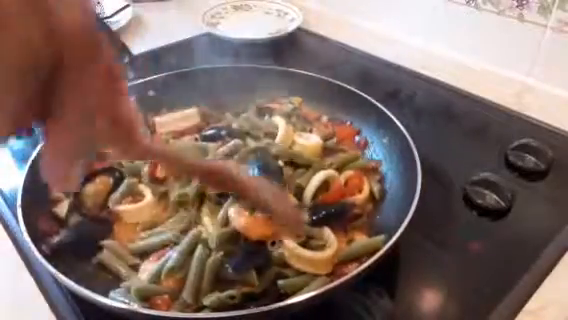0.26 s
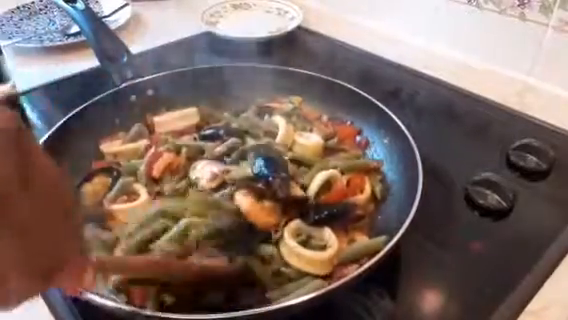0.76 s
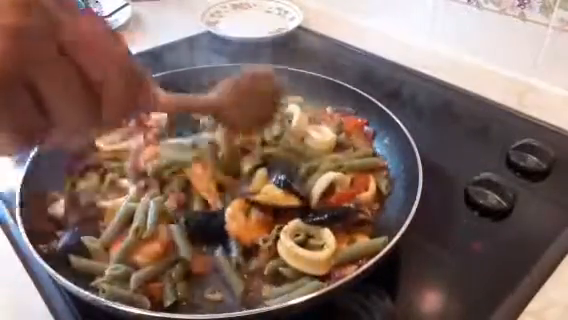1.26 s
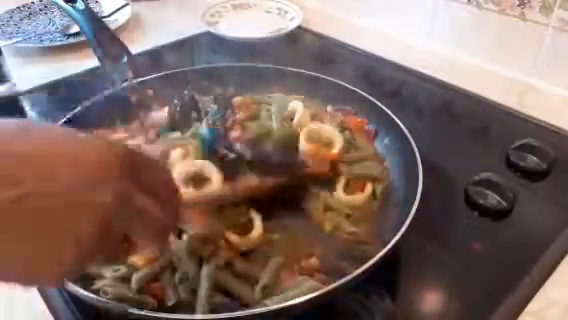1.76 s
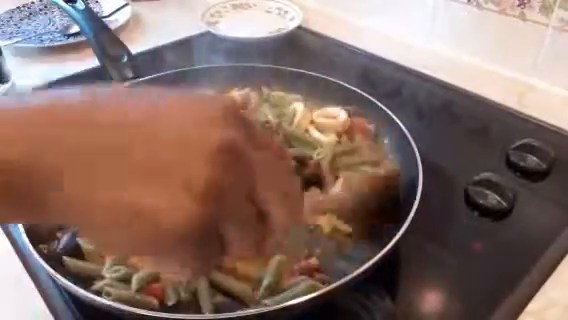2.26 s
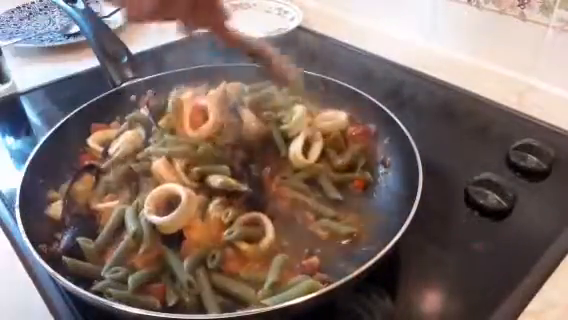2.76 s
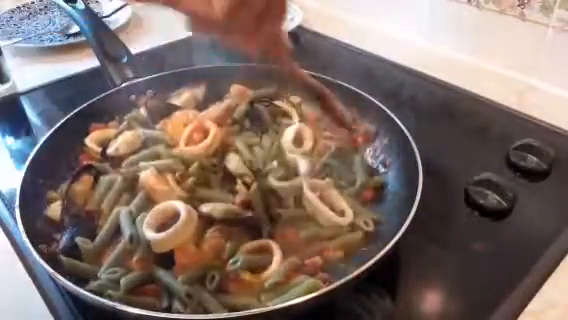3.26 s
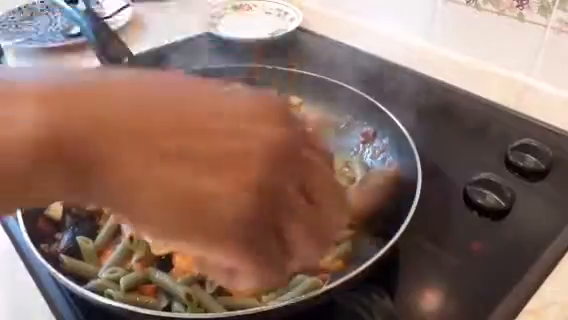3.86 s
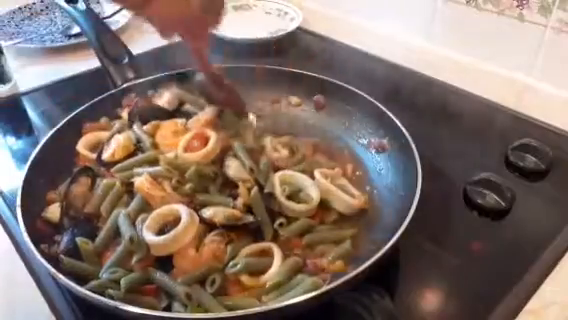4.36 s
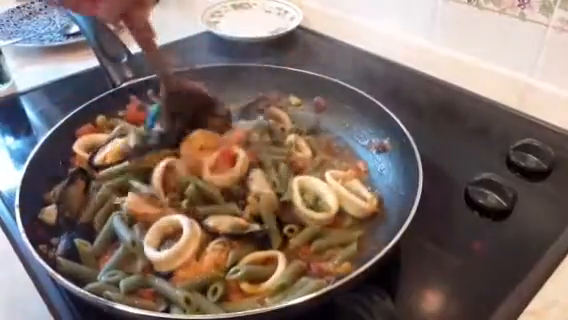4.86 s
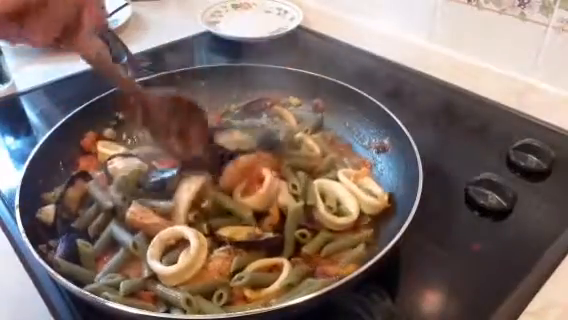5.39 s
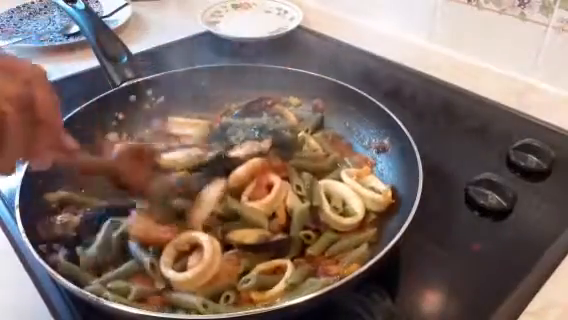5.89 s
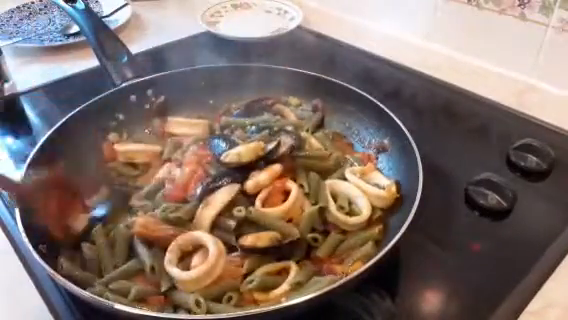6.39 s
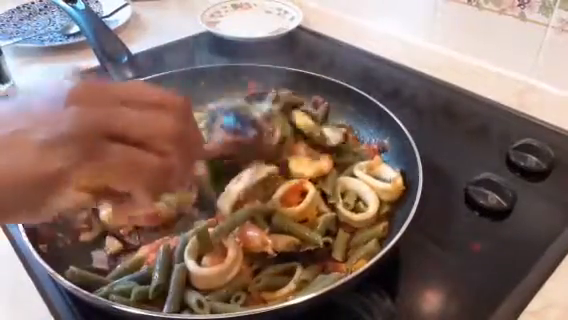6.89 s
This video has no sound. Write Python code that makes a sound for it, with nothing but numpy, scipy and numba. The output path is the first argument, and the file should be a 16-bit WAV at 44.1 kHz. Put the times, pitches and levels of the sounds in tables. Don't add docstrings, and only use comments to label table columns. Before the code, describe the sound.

A wooden spatula knocks and scrapes in a full frying pan, some taps cracking on shells, over soft sizzle and a low fan hum.

```python
import sys
import numpy as np
from scipy import signal
from scipy.fft import rfft, irfft
from scipy.io import wavfile
from scipy.ndimage import uniform_filter1d
from numba import njit

SR = 44100
rng = np.random.default_rng(int(sys.argv[2]) if len(sys.argv) > 2 else 0)


def log_audio(samples):
    frames = np.atleast_2d(samples).T
    limited = np.clip(frames, -1, 1)
    pcm = np.round(limited * 32767).astype(np.int16)
    wavfile.write(sys.argv[1], SR, pcm)


def boost_factor(decibels):
    exponent = np.asarray(decibels, float) / 20
    return 10 ** exponent


N = 314874
TIME = np.arange(N) / SR

# start_s, wall_db, hob_rel_db, base_rel_db, wall_pitch_hz
MIDDLE_BLOWS = [
    (2.29, -20, -5, -7, 734),
    (2.575, -46.5, 4, -28, 649),
    (3.403, -29.5, -2, -3.5, 574),
    (3.828, -20.5, -7.5, -2, 513),
    (6.419, -32, -7.5, -2, 730),
    (6.989, -54, -3, -27, 1230),
]
# start_s, wall_db, hob_rel_db, base_rel_db, wall_pitch_hz
EDGE_BLOWS = [(0.48, -32, 1, 6, 720), (0.529, -34, -16, 5, 800), (0.545, -27.5, -2, -21, 820),
              (0.662, -43, 1.5, 10, 646), (1.521, -25, -9.5, -1, 685), (4.662, -17.5, -13, -5.5, 690),
              (4.808, -37.5, -20.5, -4, 577), (5.143, -17, -15, -3, 1140), (5.7, -21.5, -10.5, -3, 711),
              (5.811, -25, -25, -7.5, 1160), (6.356, -19, -17.5, -14.5, 855), (6.399, -30, -15, 3, 1080),
              (6.759, -31.5, -10, -3, 960)]
# start_s, wall_db, base_rel_db, wall_pitch_hz
BUMPS = [
    (0.61, -35, 1.5, 528),
    (0.73, -34, -5.5, 540),
    (0.789, -31.5, -38, 1080),
    (1.655, -24.5, -31, 950),
    (1.804, -45, -30, 1210),
    (2.616, -36, -10.5, 493),
    (4.602, -23, -27, 1400),
    (5.249, -38.5, 5, 1160),
    (5.312, -28.5, -38, 1460),
    (6.81, -41.5, -4, 1010),
]
MIDDLE_HZ, EDGE_HZ, BUMP_HOB_DB = 132, 188.4, -61
# pitch_hz, level_db, fade60_s
HOB_MODES = [(119.2, 0.5, 0.5), (166.7, 2.5, 0.19), (201, -3.5, 0.33)]
# pitch_hz, level_db, fade60_s
BASE_MODES = [(246, -24.5, 0.54), (312.5, -3, 0.3), (359.3, -2.5, 0.52), (413.3, -15, 0.31)]
# pitch_hz, level_db, fade60_s
WALL_MODES = [(489, 11, 0.045), (613, -10.5, 0.33), (646, -4, 0.2), (711, 6.5, 0.088), (767, -7, 0.3),
              (875, 0, 0.14), (918, 10.5, 0.027), (1080, 5, 0.081), (1153, 0, 0.17), (1405, 16, 0.015)]

# start_s, level_db, pitch_hz, snap_rel_db
TICKS = [(0.722, -30, 2677, -12), (1.0195, -23, 1900, -2), (1.132, -38, 2350, -15), (1.5206, -24, 2410, -4),
         (1.8114, -27, 1450, -18), (2.0703, -29, 2050, -8), (2.6195, -26, 1300, -4),
         (3.4035, -21, 1180, -25), (3.8269, -17.5, 2330, -12), (5.3098, -26, 2100, -10),
         (5.8117, -17, 2280, -20), (6.0656, -30, 2300, -18), (6.3556, -20, 2700, 3),
         (6.4188, -26, 2350, -15), (6.9905, -33, 1460, -16), (7.0837, -31, 2200, -16)]
# start_s, level_db, pitch_hz, crack_rel_db, crack_top_rel_db
CRACKS = [(0.5495, -32, 2580, 1, -19), (1.707, -31, 1940, 1.5, -6), (1.7517, -32, 2360, -26, -6),
          (1.8444, -44.5, 1970, 13, -14), (2.0013, -51, 2600, -32, 14), (2.29, -18, 2394, -14, -12),
          (4.299, -37.5, 2450, -4, -23), (4.6041, -19, 2550, 12.5, -27), (4.9092, -35.5, 1940, -4.5, -21),
          (5.1426, -14.5, 2540, -9, -22), (5.351, -28, 1640, -31, -2), (5.699, -13, 2240, -11, -45),
          (6.7614, -17.5, 1530, -5, -1), (6.948, -37, 2570, 8, 11), (7.1304, -36, 4050, -2, 21.5)]
TAP_CRACK_DB, TAP_TOP_DB = -26, -38
SNAP_DB, SNAP_S, SNAP_HZ = -2, .0008, 5800
# share_of_tap_pitch, level_db, fade60_s
WOOD_MODES = [(.78, -9, .022), (.92, -3, .035), (1, 0, .042), (1.09, -4, .035), (1.28, -9, .022),
              (1.5, -13, .015)]
# pitch_hz, level_db, fade60_s
SHELL_MODES = [(5200, -4, .015), (5900, -3, .025), (6600, 0, .035), (7300, -3, .03), (8100, -5, .02)]
# pitch_hz, level_db, fade60_s
CHIP_MODES = [(9500, 0, .006), (12500, -2, .005)]

# start_s, level_db, upper_modes_rel_db
PINGS = [
    (0.5324, -33.5, -18),
    (0.5999, -39, -1),
    (1.5197, -32, -31),
    (4.61, -24, 0),
    (4.6793, -26.5, -30),
    (5.1443, -24, -38),
    (5.7027, -24, -31),
    (6.3684, -29, -26),
]
# pitch_hz, level_db, fade60_s
RIM_MODES = [(2483, 0, .095), (3365, -11, .08), (4177, -2, .12)]

# start_s, length_s, rumble_db, rasp_db, hollow_under_blade_hz
STROKES = [(0.0, 0.21, -73, -73, 970), (0.48, 0.32, -47, -47.5, 690), (0.76, 0.09, -41.5, -41.5, 990),
           (0.828, 0.17, -46, -50.5, 785), (1.017, 0.18, -54, -57.5, 850), (1.591, 0.22, -40.5, -40, 900),
           (1.789, 0.096, -49.5, -46.5, 1130), (2.046, 0.093, -54, -62, 910),
           (2.286, 0.26, -42.5, -45.5, 720), (2.447, 0.24, -52, -48.5, 795), (2.622, 0.2, -59, -55, 850),
           (2.98, 0.24, -48, -48.5, 926), (3.418, 0.22, -56, -52, 684), (3.942, 0.24, -42.5, -48.5, 760),
           (4.107, 0.1, -36.5, -44, 1050), (4.23, 0.27, -50.5, -49, 750), (4.658, 0.32, -52.5, -48.5, 705),
           (5.273, 0.17, -49.5, -47, 930), (5.787, 0.11, -40.5, -45, 910), (5.862, 0.14, -54, -53.5, 880),
           (6.337, 0.21, -45, -46.5, 796), (6.51, 0.31, -46.5, -48, 710), (6.85, .15, -50, -56, 1200),
           (7.065, .14, -59, -52, 1100)]
# start_s, rumble_db, rasp_db
SKIDS = [
    (.49, -47, -50),
    (1.532, -32.5, -56),
    (3.411, -43, -66),
    (3.84, -64, -47.5),
    (4.609, -39.5, -27),
    (5.15, -60, -37.5),
    (5.711, -54, -46),
    (6.768, -63, -32),
]
SKID_FADE60_S, SWELL, HOLLOW_GLIDE = 0.22, 0.89, 0.19
REST_DB, REST_HZ = -70, 770
SQUEAL_HZ, SQUEAL_SAG_HZ, PRESSED_DB = 2300, 350, -42
LIFT_DB_PER_OCTAVE = 7
# pitch_hz, level_db
RASP_TONE = [(1200, -18.5), (1600, 14.5), (2300, -1), (3200, 6), (4500, -1), (7000, -7.5)]

# start_s, level_db
FRYING = [(0.0, -54.5), (0.34, -58), (0.69, -52.5), (1.11, -57.5), (1.53, -59.5), (1.77, -54),
          (2.13, -59.5), (2.5, -54), (2.76, -57.5), (3.06, -54.5), (3.24, -59.5), (4.26, -58.5),
          (5.19, -59.5), (5.37, -54), (5.7, -57.5), (6.18, -58.5), (6.56, -54.5), (7.14, -55)]
# pitch_hz, level_db
SIZZLE_TONE = [(1470, -18), (2500, -42), (2830, -14), (3520, -4.5), (6970, -7), (8940, -5.5), (10800, -10),
               (14900, -10), (16000, -33)]
# pitch_hz, level_db
AIR_TONE = [(18, -42), (30, -20), (62, -32), (91, 3), (123, -1.5), (239, -19), (359, -1), (409, -11),
            (575, -2), (728, -6.5), (864, -5.5), (1220, -4.5), (1680, -6), (2120, -4), (5000, -12),
            (6500, -11.5), (11000, -120)]
FAN_HZ, FAN_DB, AIR_DB = 47.7, -61.5, -53
# pitch_hz, level_db
ROOM_TONE = [(60, -12), (300, -4), (1000, -2), (3000, -1), (8000, -1), (16000, -6)]

# pitch_hz, lag_radians
PORT_LAG = [(0, 0), (430, .2), (1030, 1.0), (1640, 2.9), (16000, 27.4), (22050, 37.7)]
# pitch_hz, share
PORT_ALIKE = [(30, 0.3), (130, 0.79), (300, 0.93), (800, 0.87), (3000, 0.059), (16000, 0.028)]
# pitch_hz, level_db
PORT_TILT = [(30, -4), (150, -2.5), (400, -3), (1500, -1.5), (5000, -1.5), (9000, -2.5), (13000, 2)]
TOP_HZ = 15850


def knocks():
    out = np.zeros(N)
    blows = [(*row, MIDDLE_HZ) for row in MIDDLE_BLOWS] + [(*row, EDGE_HZ) for row in EDGE_BLOWS]
    blows += [(s, db, BUMP_HOB_DB, base_db, hz, EDGE_HZ) for s, db, base_db, hz in BUMPS]
    for s, db, *place in blows:
        add(out, s, boost_factor(db) * pan_blow(*place))
    taps = [(*row, SNAP_DB) for row in CRACKS]
    taps += [(s, db, hz, TAP_CRACK_DB, TAP_TOP_DB, snap_db) for s, db, hz, snap_db in TICKS]
    for s, db, *contact in taps:
        add(out, s, boost_factor(db) * tap(*contact))
    for s, db, upper_db in PINGS:
        add(out, s, boost_factor(db) * rim_ping(upper_db))
    return out


def pan_blow(hob_db, base_db, wall_hz, hob_hz):
    hob = struck(favour(HOB_MODES, hob_hz, 16), rise_s=.008, detune=.01,
                 crack_db=-8, crack_s=.012, scatter_db=1)
    base = struck(BASE_MODES, rise_s=0.0076, detune=0.0033, crack_db=2, crack_s=0.016)
    wall = struck(favour(WALL_MODES, wall_hz, 12), rise_s=.0007, detune=.003,
                  crack_db=-6, crack_s=.006, scatter_db=1.5)
    return boost_factor(hob_db) * hob + boost_factor(base_db) * base + wall


def tap(hz, crack_db, top_db, snap_db):
    modes = [(share * hz, db, t60) for share, db, t60 in WOOD_MODES]
    wood = struck(modes, rise_s=.0003, detune=.01, crack_db=-5, crack_s=.0045, scatter_db=1)
    shell = struck(SHELL_MODES, rise_s=.0002, detune=.01, crack_db=7, crack_s=.004)
    chip = struck(CHIP_MODES, rise_s=.0002, detune=.05, crack_db=9, crack_s=.002)
    return wood + boost_factor(snap_db) * snap() + boost_factor(crack_db) * shell + boost_factor(top_db) * chip


def snap():
    t = TIME[:SR // 2]
    burst = rng.standard_normal(len(t)) * np.exp(-t / SNAP_S)
    burst = signal.sosfilt(signal.butter(3, [1500, SNAP_HZ], "band", fs=SR, output="sos"), burst)
    return burst / abs(burst).max()


def rim_ping(upper_db):
    rim = RIM_MODES[:2] + [(hz, db + upper_db, t60) for hz, db, t60 in RIM_MODES[2:]]
    return struck(rim, rise_s=.002, detune=.002, crack_db=-14, crack_s=.006, scatter_db=1)


def struck(modes, rise_s, detune, crack_db, crack_s, scatter_db=7.5):
    t = TIME[:SR // 2]
    hz, db, t60 = np.transpose(modes)[:, :, None]
    level_luck, pitch_luck, phase_luck = rng.standard_normal((3, len(modes), 1))
    fading = boost_factor(db + scatter_db * level_luck - 60 * t / t60)
    tones = fading * np.sin(2 * np.pi * hz * (1 + detune * pitch_luck) * t + 0.21 * phase_luck)
    tones = tones.sum(0) * (1 - np.exp(-t / rise_s))
    contact = np.exp(-t / crack_s) + .3 * np.exp(-t / (6 * crack_s))
    sos = signal.butter(3, [.8 * hz.min(), 1.25 * hz.max()], "band", fs=SR, output="sos")
    crack = signal.sosfilt(sos, rng.standard_normal(len(t)) * contact)
    both = tones / abs(tones).max() + boost_factor(crack_db) * crack / abs(crack).max()
    return both / abs(both).max()


def favour(modes, hz, db_per_octave):
    return [(f, db - db_per_octave * abs(np.log2(f / hz)), t60) for f, db, t60 in modes]


def scrape(rumble_db, rasp_db, hollow_hz, edge_hz):
    judder = boost_factor(2 * walk(45))
    slips = np.array([judder * clicks(4000, 2.5) for _ in range(3)])
    hollow = np.array([sweep(sweep(x, hollow_hz, .35), hollow_hz, .4) for x in slips])
    edge = np.array([sweep(sweep(x, edge_hz, .3), edge_hz, .4) for x in slips])
    body = unit(ring(slips, BASE_MODES + WALL_MODES, shorten=0.59))
    body = body + boost_factor(-13.0) * unit(ring(slips, HOB_MODES, shorten=1.0))
    body_db = -1.0 - LIFT_DB_PER_OCTAVE * np.log2(hollow_hz / REST_HZ)
    rumble = boost_factor(body_db) * body + boost_factor(-7.5) * unit(hollow)
    rasp = boost_factor(1) * unit(colour(slips, RASP_TONE)) + boost_factor(-6.5) * unit(edge)
    return boost_factor(rumble_db) * rumble + boost_factor(rasp_db) * rasp


def hand():
    rest = boost_factor(REST_DB) ** 2
    power = np.full((2, N), rest)
    weight, hollow = np.full(N, rest), np.full(N, REST_HZ * rest)
    for s, length, rumble_db, rasp_db, hz in STROKES:
        along = np.clip((TIME - s) / length, 0, 1)
        swell = np.abs(np.sin(np.pi * along)) ** (2 * SWELL)
        power += boost_factor(np.array([[rumble_db], [rasp_db]])) ** 2 * swell
        pull = boost_factor(rumble_db) ** 2 * swell
        weight += pull
        hollow += pull * hz * (1 + HOLLOW_GLIDE * (along - .5))
    squeal = SQUEAL_HZ - SQUEAL_SAG_HZ * power[1] / (power[1] + boost_factor(PRESSED_DB) ** 2)
    for s, rumble_db, rasp_db in SKIDS:
        fade_db = 60 * np.maximum(TIME - s, 0) / SKID_FADE60_S
        power += (TIME > s) * boost_factor(np.array([[rumble_db], [rasp_db]]) - fade_db) ** 2
    rumble_db, rasp_db = 10 * np.log10(power)
    return rumble_db, rasp_db, hollow / weight, squeal


def sizzle(sizzle_db):
    hiss = rng.standard_normal((3, N))
    bubbles = np.array([clicks(1500, 3.5) for _ in range(3)])
    spits = clicks(25, 3)
    fizz = unit(colour(hiss + boost_factor(-4) * bubbles + boost_factor(-20) * spits, SIZZLE_TONE))
    lower = signal.sosfilt(signal.butter(4, 8500, fs=SR, output="sos"), fizz)
    upper = signal.sosfilt(signal.butter(4, 8500, "high", fs=SR, output="sos"), fizz)
    return boost_factor(sizzle_db) * ports(boost_factor(walk(69)) * lower + boost_factor(walk(36)) * upper, focus=0.1)


def fan():
    turns = np.cumsum(FAN_HZ + .4 * walk(1.5)) / SR
    hum = np.sqrt(2) * boost_factor(FAN_DB + walk(4)) * np.sin(2 * np.pi * turns)
    air = boost_factor(AIR_DB + 0.22 * walk(2.55)) * unit(colour(rng.standard_normal((3, N)), AIR_TONE))
    return ports(air, focus=0.3) + hum


def kitchen(x, t60_low, t60_high):
    t = TIME[:SR // 2]
    noise = rng.standard_normal((3, len(t))) * (1 - np.exp(-t / 0.00043))
    low = signal.lfilter([.15], [1, -.85], noise)
    tail = low * boost_factor(-60 * t / t60_low) + (noise - low) * boost_factor(-60 * t / t60_high)
    echo = signal.fftconvolve(x[None], tail / np.sqrt(SR / 100), axes=1)[:, :N]
    return ports(colour(echo, ROOM_TONE), focus=0.19)


def ports(x, focus):
    f = np.fft.rfftfreq(N, 1 / SR)
    hz, share = np.transpose(PORT_ALIKE)
    common = np.clip(np.interp(np.log(f + 1), np.log(hz), share) ** (1 / focus), 0, 1)
    shared, left, right = rfft(x)
    late = shared * np.exp(-1j * np.interp(f, *np.transpose(PORT_LAG)))
    both = np.sqrt(common) * np.array([shared, late])
    return irfft(both + np.sqrt(1 - common) * np.array([left, right]), N)


def add(out, s, sound):
    i = int(s * SR)
    out[i:i + len(sound)] += sound[:N - i]


def unit(x):
    return x / np.sqrt(np.mean(x ** 2))


def colour(x, shape):
    hz, db = np.transpose(shape)
    f = np.maximum(np.fft.rfftfreq(x.shape[-1], 1 / SR), 1)
    return irfft(rfft(x) * boost_factor(np.interp(np.log(f), np.log(hz), db)), x.shape[-1])


def walk(rate):
    k = int(SR / rate)
    steps = np.repeat(rng.standard_normal(N // k + 1), k)
    return 1.3 * uniform_filter1d(uniform_filter1d(steps, k), k)[:N]


def clicks(per_s, spread_db):
    chance, size, sign = rng.random(N), rng.exponential(1, N), rng.standard_normal(N)
    return unit((chance < per_s / SR) * boost_factor(spread_db * np.minimum(size, 4)) * sign)


@njit
def sweep(x, hz, k):
    y, band, low = np.empty(len(x)), 0., 0.
    for i in range(len(x)):
        g = np.tan(np.pi * hz[i] / SR)
        v = (band + g * (x[i] - low)) / (1 + g * (g + k))
        band, low, y[i] = 2 * v - band, low + 2 * g * v, k * v
    return y


def ring(x, modes, shorten):
    out = 0
    for hz, db, t60 in modes:
        pole = np.exp(2j * np.pi * hz / SR - np.log(1000) / (shorten * t60 * SR))
        out = out + boost_factor(db) * signal.lfilter([1], [1, -pole], x).imag
    return out


def scene():
    blows, drag = knocks(), scrape(*hand())
    silence = 0 * blows
    direct = ports(np.array([blows, silence, silence]), focus=4) + ports(drag, focus=0.28)
    room = kitchen(boost_factor(-9) * blows + boost_factor(-11) * drag[0], t60_low=.4, t60_high=.36)
    return direct + room + sizzle(np.interp(TIME, *np.transpose(FRYING))) + fan()


def band_limit(x):
    return signal.sosfilt(signal.butter(12, 16460, fs=SR, output="sos"), x)


def record(dry):
    left = colour(dry[0], PORT_TILT)
    right = colour(dry[1], [(hz, -db) for hz, db in PORT_TILT])
    top_cut = signal.ellip(10, .3, 60, TOP_HZ, fs=SR, output="sos")
    bass_cut = signal.butter(3, 38, "high", fs=SR, output="sos")
    mix = signal.sosfilt(np.vstack([top_cut, bass_cut]), [left, right])
    return band_limit(mix)


dry = scene()
out = record(dry)
log_audio(out)
```